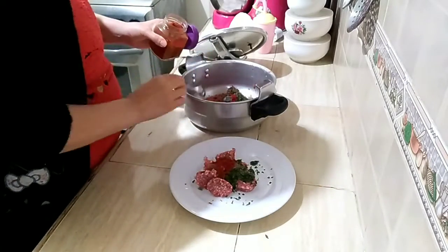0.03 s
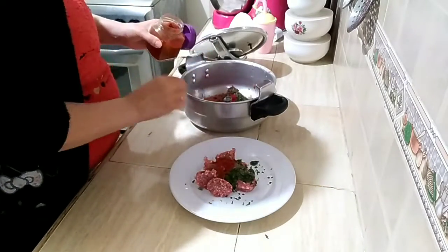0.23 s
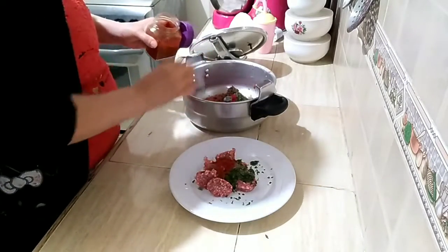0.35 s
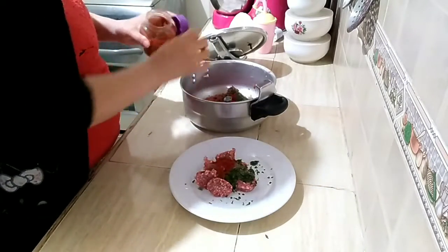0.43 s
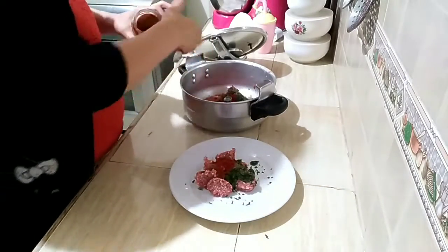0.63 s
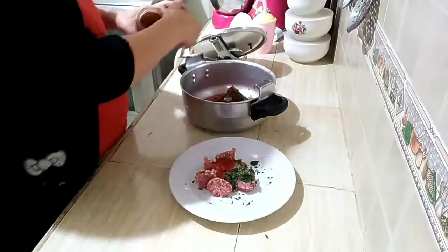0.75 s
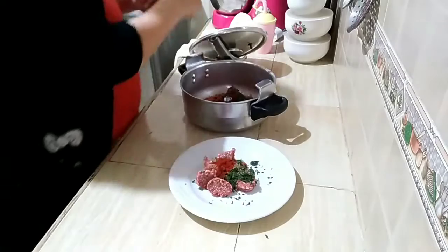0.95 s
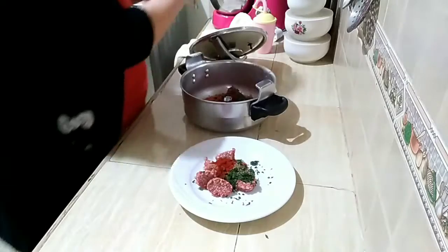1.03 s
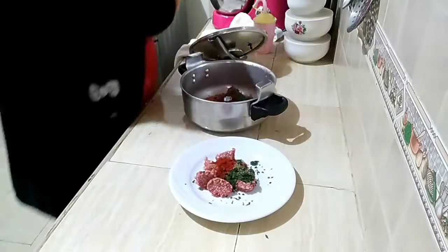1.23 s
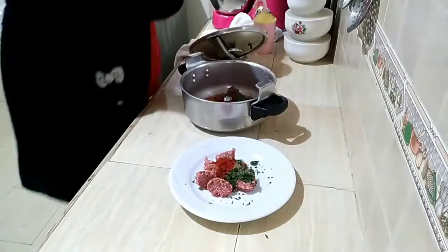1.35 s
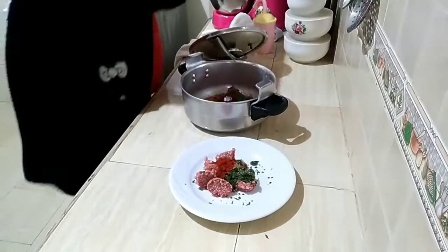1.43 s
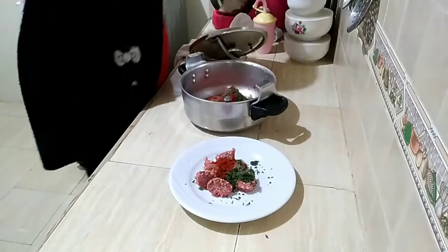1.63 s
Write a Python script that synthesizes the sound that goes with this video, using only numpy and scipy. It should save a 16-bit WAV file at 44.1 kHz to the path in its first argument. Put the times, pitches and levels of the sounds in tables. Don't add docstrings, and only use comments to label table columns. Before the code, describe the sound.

Glass jar clinks and clatter, close to a phone in a reflective tiled kitchen. Two sharp, loud raps ring brightly at about 0.2 and 0.36 seconds, their tails cut short. Thin lid ticks come near 0.85. From 1.0 to 1.25 jars bump in a quick run of hollow thuds and clinks, strongest around 1.15. Faint settling taps follow until 1.7, over low, uneven rumble.

```python
import sys
import numpy as np
from scipy import signal
from scipy.fft import rfft, irfft
from scipy.io import wavfile
from scipy.ndimage import uniform_filter1d, minimum_filter1d

SR = 44100
rng = np.random.default_rng(int(sys.argv[2]) if len(sys.argv) > 2 else 0)


def store_wav(level_fs):
    pcm = np.round(np.clip(np.atleast_2d(level_fs), -1, 1) * 32767)
    wavfile.write(sys.argv[1], SR, pcm.T.astype(np.int16))


def voltage_ratio(decibels):
    exponent = np.asarray(decibels, float) / 20
    return 10 ** exponent


N = 74970


def evened(x):
    return x / np.sqrt(np.mean(x ** 2) + 1e-20)


def read(points, hz):
    f, value = np.transpose(points)
    return np.interp(np.log(hz + 1), np.log(f + 1), value, value[0], value[-1])


def add(mix, s, sound):
    part = mix[..., round(s * SR):][..., :sound.shape[-1]]
    part += sound[..., :part.shape[-1]]


def burst(colour, length_s):
    u = np.arange(4096) / SR / max(length_s, 1e-4)
    hz = np.fft.rfftfreq(4096, 1 / SR)
    octaves_below = np.maximum(np.log2(colour[0][0] / (hz + 1)), 0)
    spectrum = rfft(rng.standard_normal(4096)) * voltage_ratio(read(colour, hz) - 12 * octaves_below)
    return evened(irfft(spectrum)) * 2 * u * np.exp(-u)


def ring(modes, spread_db, size, detune=0.):
    hz, db, t60 = np.transpose(modes)[:, :, None]
    t = np.arange(size) / SR
    luck = rng.standard_normal((len(modes), 2))
    envelope = voltage_ratio(db + spread_db * luck[:, :1] - 60 * t / t60)
    parts = envelope * np.sin(2 * np.pi * hz * (1 + detune * luck[:, 1:]) * t)
    return parts.sum(0) / np.sqrt(.5 * (voltage_ratio(db) ** 2).sum())


def from_the_right(x):
    return np.array([np.roll(x, 15), x])


def two_ports(frame_count, size):
    # (frequency [Hz], left-right correlation [-1..1])
    likeness = [(60, -1.2), (150, 1), (300, 0.52), (700, 0.24), (1500, -0.039), (3000, 0.05), (9000, 0.11)]
    hz = np.fft.rfftfreq(size, 1 / SR)
    a, b, c, d = rng.standard_normal((frame_count, len(hz), 4)).T
    same = np.clip(read(likeness, hz), -1, 1)[:, None]
    left = a + 1j * b
    right = same * left + np.sqrt(1 - same ** 2) * (c + 1j * d)
    return hz, np.array([left, right])


def kitchen(x):
    # (frequency [Hz], t60 [s])
    room_t60 = [(100, 0.88), (260, 0.79), (450, 0.55), (1500, 0.54), (5000, 0.5), (9000, 0.46),
                (15000, 0.55)]
    early_db, early_s, onset_s = 4.5, .012, 0.0011
    hz, z = two_ports(300, size=512)
    t = np.arange(300) * 128 / SR
    decay = voltage_ratio(-60 * t / read(room_t60, hz)[:, None])
    tail = signal.istft(z * decay, nperseg=512, noverlap=384)[1]
    t = np.arange(tail.shape[1]) / SR
    tail = tail * np.clip(t / onset_s, 0, 1) * voltage_ratio(early_db * np.exp(-(t / early_s) ** 2))
    return signal.fftconvolve(x[None], tail / np.linalg.norm(tail[0]), axes=1)[:, :N]


def hum():
    # (frequency [Hz], density [dB per Hz])
    rumble_colour = [(25, -16), (60, -15.5), (110, 5), (155, -8), (240, -19.5), (330, -25), (600, -38),
                     (16000, -54.5)]
    # (time [s], level [dB])
    rumble_level = [(0, -61), (.045, -56.5), (.12, -70), (0.202, -76), (0.212, -44), (.3, -51), (.5, -51),
                    (.7, -55.5), (0.764, -69), (0.774, -57), (0.821, -51), (.835, -79), (0.859, -53),
                    (.93, -69.5), (1.051, -65), (1.1, -53.5), (1.25, -46), (1.44, -52), (1.52, -64.5),
                    (1.7, -80)]
    # (time [s], length [s], frequency [Hz], level [dB])
    appliance_tones = [
        (0, .06, 430, -76),
        (.11, .05, 500, -73),
        (.155, .045, 460, -74),
        (.07, .12, 2560, -88),
    ]
    hz, z = two_ports(N // 512 + 5, size=2048)
    lumps = uniform_filter1d(rng.standard_normal(z.shape[1:]), 3, 0)
    lumps = evened(uniform_filter1d(lumps, 2, 1))
    z = z * voltage_ratio(read(rumble_colour, hz)[:, None] + 2 * lumps)
    out = evened(signal.istft(z, nperseg=2048, noverlap=1536)[1][:, :N])
    out = out * voltage_ratio(np.interp(np.arange(N) / SR, *np.transpose(rumble_level)))
    for s, length_s, tone_hz, db in appliance_tones:
        t = np.arange(0, length_s, 1 / SR)
        waver = 1 + 0.017 * evened(uniform_filter1d(rng.standard_normal(N), 900))[:len(t)]
        swell = np.sin(np.pi * t / length_s)
        add(out, s, voltage_ratio(db) * swell * np.sin(2 * np.pi * np.cumsum(tone_hz * waver) / SR))
    return out


def lid():
    # (time [s], level [dB], contact length [s])
    lid_ticks = [
        (.814, -47.5, .0025),
        (0.855, -44, 0.0026),
        (.872, -65, 0.0096),
    ]
    # (frequency [Hz], density [dB per Hz])
    tick_colour = [(1000, -31), (3000, -22.5), (5500, -19), (6300, -5), (7000, -22), (7900, -7.5),
                   (9000, -19), (15000, -23.5)]
    ticks = np.zeros(N)
    for s, db, length_s in lid_ticks:
        add(ticks, s, voltage_ratio(db) * burst(tick_colour, length_s))
        ping = ring([(8000, -11.5, 0.092), (6300, -15.0, 0.044)], 0, size=4000)
        add(ticks, s + length_s, voltage_ratio(db - 6) * ping)
    return ticks + voltage_ratio(1) * kitchen(ticks)


def jars():
    # (time [s], clatter level [dB], body level [dB], contact length [s])
    bumps = [(0.987, -29.5, -30.5, .001), (1.017, -34, -33, .004), (1.04, -39, -28, 0.0035),
             (1.045, -30, -33.5, 0.0061), (1.086, -35.5, -29, 0.0026), (1.135, -30.5, -23, 0.0046),
             (1.146, -20, -22.5, 0.002), (1.152, -11.5, -18.5, .002), (1.207, -19, -19, 0.0018),
             (1.236, -33, -27, 0.0012), (1.255, -52, -55, 0.001), (1.39, -41.5, -42.5, .006),
             (1.47, -52, -55, 0.0026), (1.519, -50, -70, .003), (1.541, -48, -79, 0.0047),
             (1.588, -41.5, -63, 0.0022), (1.677, -55.5, -82.5, 0.002)]
    # (frequency [Hz], density [dB per Hz])
    clatter_colour = [(2060, -11), (3500, -11), (3890, -7.5), (4250, -8), (6630, -3), (10600, -13),
                      (11600, -17), (14100, -20.5), (15600, -28)]
    # (frequency [Hz], density [dB per Hz])
    body_colour = [(350, -13.5), (600, -6), (922, -11.5), (1260, -3), (1890, -18), (2350, -6), (3130, -11),
                   (3900, -17.5), (4500, -13), (5850, -18), (9900, -120)]
    # (frequency [Hz], level [dB], t60 [s])
    clink_modes = [(1293, -4.5, 0.0315), (2610, -11.5, 0.04), (5400, -6, 0.036), (6570, 0.5, 0.016),
                   (6500, -1.5, 0.011), (8160, -6.5, 0.034)]
    # (time [s], level [dB], frequency [Hz], t60 [s])
    pings = [
        (1.050, -28, 5230, .06),
        (1.586, -47, 3620, .06),
        (.989, -30, 6540, .02),
        (1.02, -34, 6400, .02),
    ]
    # (time [s], level [dB], frequency [Hz], t60 [s])
    thuds = [(.988, -40.5, 540, 0.21), (1.025, -39, 560, 0.11), (1.038, -28.5, 490, 0.088),
             (1.047, -27, 400, 0.063), (1.060, -30, 410, 0.12), (1.046, -33.5, 1600, 0.051),
             (1.152, -27, 195, 0.17), (1, -31.5, 470, 0.034), (1.152, -28.5, 1090, 0.081),
             (1.5, -39, 1342, 0.041), (0.29, -36.5, 280, 0.22), (.415, -38.5, 230, 0.21),
             (.215, -32, 450, 0.089), (.216, -33, 1210, 0.12), (1.2, -46.5, 223, 0.064),
             (1.545, -53, 250, 0.056), (1.676, -65, 490, .06), (1.086, -22, 235, 0.063),
             (1.107, -20.5, 258, 0.057), (1.136, -22.5, 203.6, 0.06), (1.140, -26, 359, 0.098),
             (1.234, -25, 425, 0.089), (1.205, -24.5, 270, 0.076), (1.206, -26, 770, 0.051),
             (1.236, -22.5, 215, 0.11), (2.3, -45, 370, 0.065), (1.8, -41, 213, 0.075),
             (1.45, -52, 480, 0.19), (1.50, -54.5, 240, 0.16), (0.75, -58.5, 130, 0.055),
             (1.599, -53, 520, 0.059), (1.643, -51, 400, 0.062), (1.589, -65, 1348, 0.12)]
    clink_db, hard_room_db, thud_room_db = -8, 6, -9
    thud_rise_s, thud_rattle = .0035, .25
    thud_swell = 1 - np.exp(-np.arange(8000) / SR / thud_rise_s)
    out = np.zeros((2, N))
    for turn in range(3):
        hard, dull = np.zeros(N), np.zeros(N)
        for s, db, body_db, length_s in bumps[turn::3]:
            clatter = voltage_ratio(db) * burst(clatter_colour, length_s)
            add(hard, s, clatter + voltage_ratio(body_db) * burst(body_colour, length_s))
            clink = ring(clink_modes, 2.5, size=6000, detune=0.026)
            add(hard, s + length_s, voltage_ratio(db + clink_db) * clink)
        for s, db, hz, t60 in pings[turn::3]:
            add(hard, s, voltage_ratio(db) * ring([(hz, 0, t60)], 0, size=6000))
        for s, db, hz, t60 in thuds[turn::3]:
            rattle = evened(uniform_filter1d(rng.standard_normal(8000), size=150))
            hollow = ring([(hz, 0, t60), (1.22 * hz, -8, t60)], 0, size=8000)
            add(dull, s, voltage_ratio(db) * thud_swell * (1 + thud_rattle * rattle) * hollow)
        room = kitchen(voltage_ratio(hard_room_db) * hard + voltage_ratio(thud_room_db) * dull)
        out += from_the_right(hard) + dull + room
    return out


def click():
    # (frequency [Hz], density [dB per Hz])
    blow_colour = [(100, -29), (400, -17.5), (1200, -14.5), (1800, -19), (3200, -17), (6650, -11),
                   (9500, -14), (15600, -23)]
    # (frequency [Hz], width [Hz], height [dB])
    resonances = [(500, 250, 3.5), (930, 70, 3.5), (2586, 710, 9.5), (2923, 68, 8.5), (4151, 70, 11),
                  (5036, 550, 13), (3600, 580, -0.5), (5380, 270, -0.5), (6296, 840, 8), (6816, 420, 14.5),
                  (7770, 220, 5), (7820, 310, 8), (8380, 830, 9), (10450, 400, 5.5)]
    hz = abs(np.fft.fftfreq(8192, 1 / SR))
    db = read(blow_colour, hz)
    for peak_hz, width_hz, peak_db in resonances:
        db = db + peak_db / (1 + (2 * (hz - peak_hz) / width_hz) ** 2)
    spectrum = np.exp(np.conj(signal.hilbert(np.log(voltage_ratio(db)))))
    shape = np.fft.ifft(spectrum).real[:4096]
    return shape / abs(shape).max()


def spoon():
    # (time [s], strength [dB], knock level [dB], belly level [dB])
    raps = [
        (0.2145, 3.5, -22.5, -28),
        (0.3622, 3.5, -23, -27),
    ]
    # (frequency [Hz], level [dB], t60 [s])
    glass_modes = [(4174, -12.5, 0.33), (5036, -11, .35), (5138, -10, 0.35), (5480, -13, .4),
                   (6272, -1, 0.46), (6560, -6, .4), (6660, -4, .35), (6720, -2, .4), (6825, 1, 0.4),
                   (6940, -5, .3), (7630, -7, .35), (8510, -9, .35)]
    # (frequency [Hz], level [dB], t60 [s])
    knock_modes = [(277, -20, 0.094), (319, -8.5, .07), (455, -9.5, 0.083), (550.7, 3.5, 0.12),
                   (602.6, -15.5, .15)]
    glass_db, glass_to_room, room_db = -23.5, 0.24, 13.5
    lid_hz, lid_db, lid_t60_s = 7980, -57.5, 1.4
    belly_hz, belly_t60_s, belly_rise_s = 906, 0.39, 0.016
    direct_db, echo_db, echo_s = 1, -6, .02
    blow, glass, belly = np.zeros((3, N))
    swell = 1 - np.exp(-np.arange(22050) / SR / belly_rise_s)
    for s, db, knock_db, belly_db in raps:
        add(blow, s, voltage_ratio(db) * click())
        boom = swell * ring([(belly_hz, 0, belly_t60_s)], 0, size=22050)
        add(belly, s, voltage_ratio(db + belly_db) * boom)
        add(belly, s, voltage_ratio(knock_db) * ring(knock_modes, 0, size=8000))
        add(glass, s, voltage_ratio(db + glass_db) * ring(glass_modes, 0.57, size=22050))
        add(glass, s, voltage_ratio(db + lid_db) * ring([(lid_hz, 0, lid_t60_s)], 0, size=40000))
    echoes = np.zeros((2, 2600))
    at = rng.integers(60, 2600, (2, 14))
    strength = voltage_ratio(echo_db) * np.exp(-at / SR / echo_s) * rng.choice([-1., 1.], at.shape)
    np.put_along_axis(echoes, at, strength, 1)
    echoes[:, 0] = voltage_ratio(direct_db)
    near = signal.fftconvolve(blow[None], echoes, axes=1)[:, :N] + from_the_right(glass + belly)
    return near + voltage_ratio(room_db) * kitchen(blow + glass_to_room * glass)


def scene():
    open_db, shut_db, depth_db = -19.5, -72.5, -21
    hits = spoon() + jars() + lid()
    power = abs(uniform_filter1d((hits ** 2).mean(0), 600))
    level_db = 10 * np.log10(power + 1e-12)
    shut = np.clip((open_db - level_db) / (open_db - shut_db), 0, 1)
    return hits * voltage_ratio(depth_db * shut ** 2) + hum()


def roll_off(x):
    return signal.sosfilt(signal.butter(12, 15790, fs=SR, output="sos"), x)


def record(dry):
    # (frequency [Hz], left over right [dB])
    port_lean = [(100, 0), (500, -1), (1500, 1), (3000, 0.3), (6000, -4.5), (9000, 9), (13000, 0.7)]
    low_cut_hz, ceiling = 37, 1.22
    lean = read(port_lean, np.fft.rfftfreq(N, 1 / SR)) / 2
    x = irfft(rfft(dry) * voltage_ratio([lean, -lean]), N)
    x = signal.sosfilt(signal.butter(2, low_cut_hz, "high", fs=SR, output="sos"), x)
    peak = -minimum_filter1d(-abs(x).max(0), size=129)
    over = np.maximum(peak / ceiling, 1)
    return roll_off(x / uniform_filter1d(over, size=65))


dry = scene()
out = record(dry)
store_wav(out)
```